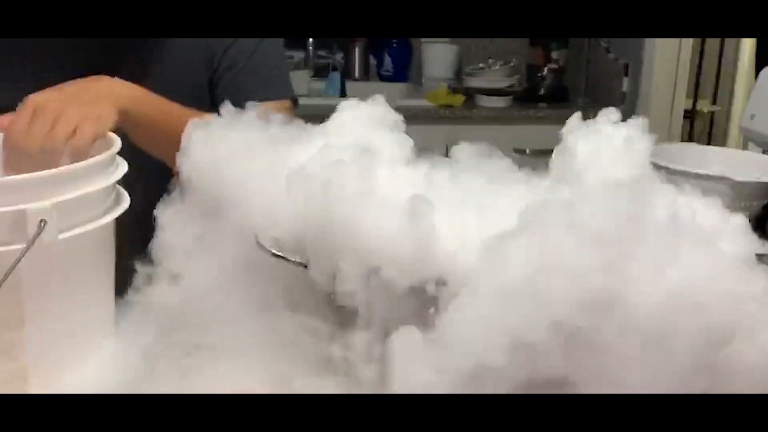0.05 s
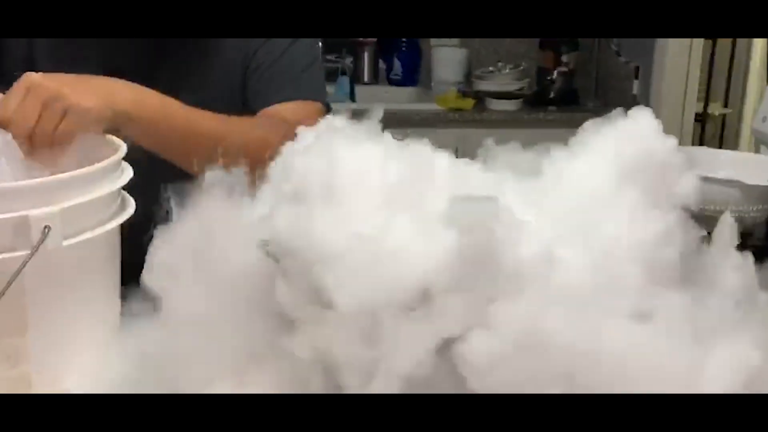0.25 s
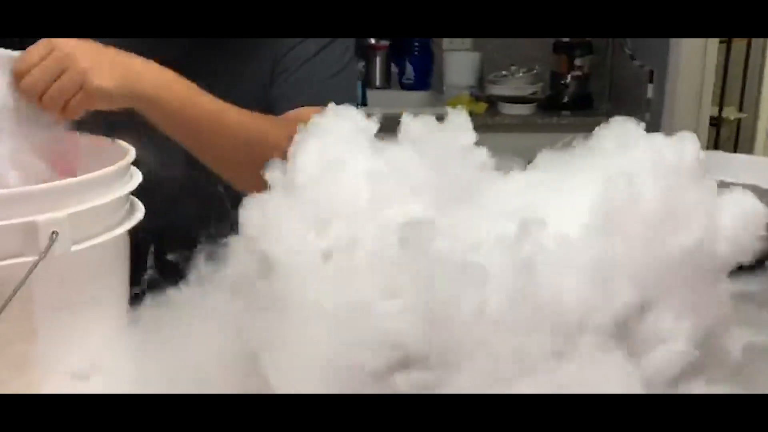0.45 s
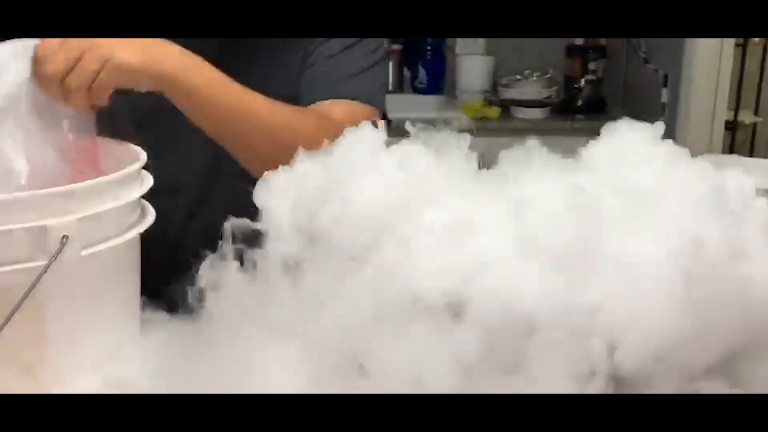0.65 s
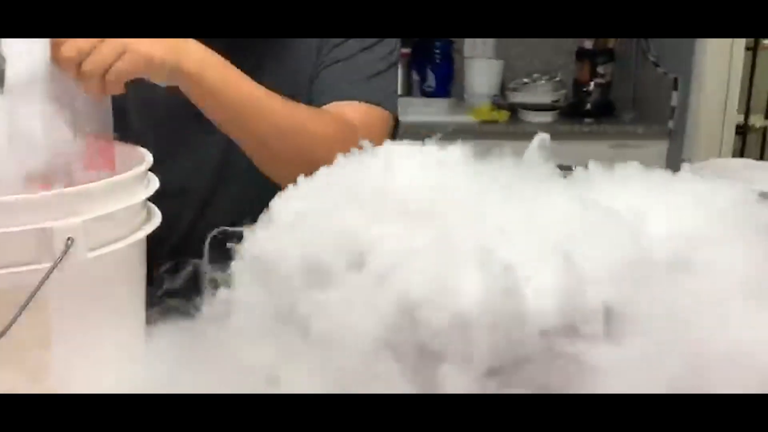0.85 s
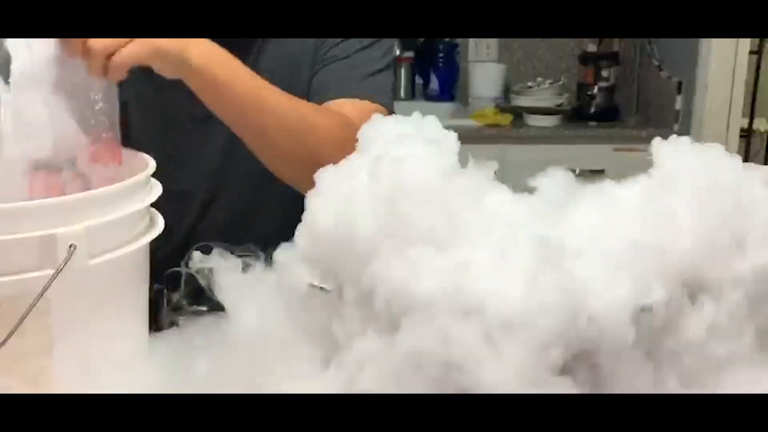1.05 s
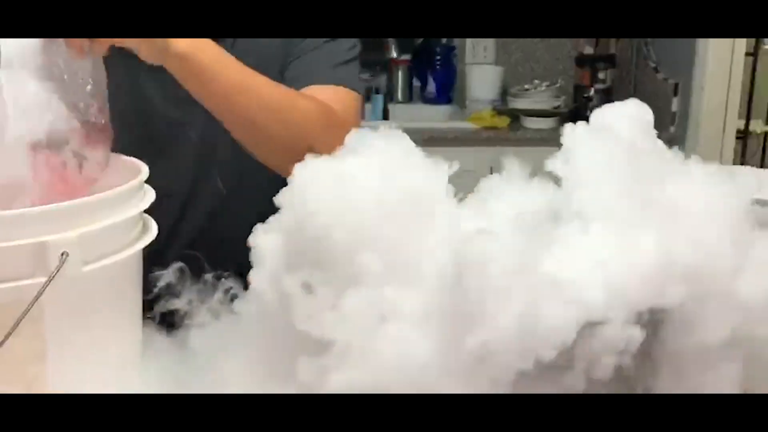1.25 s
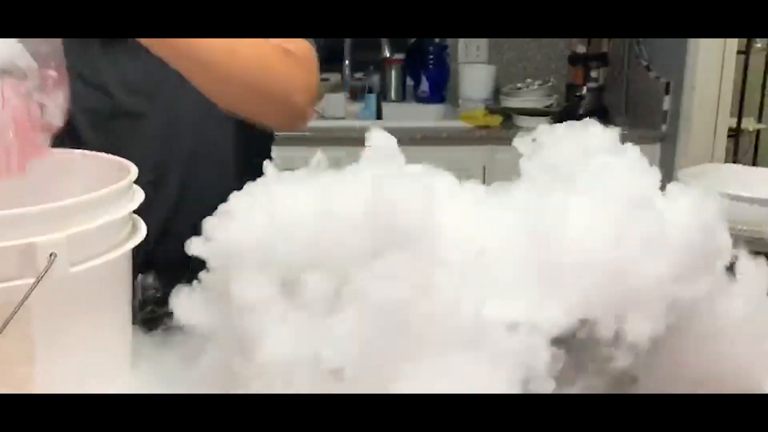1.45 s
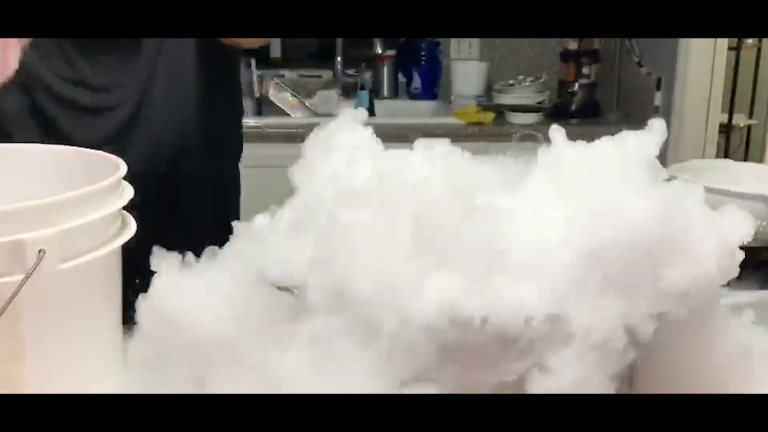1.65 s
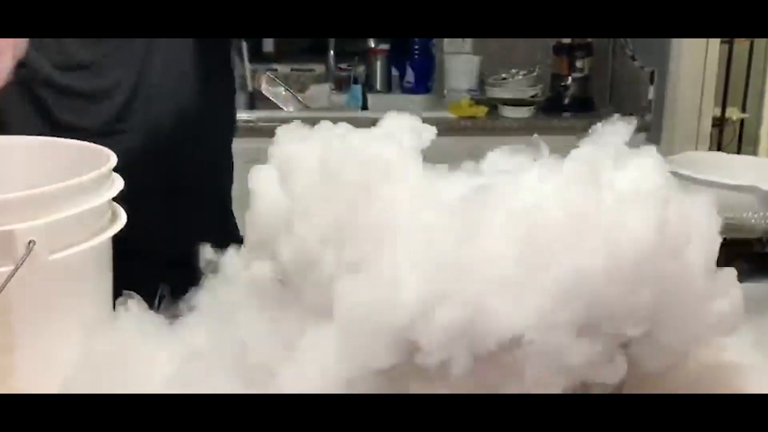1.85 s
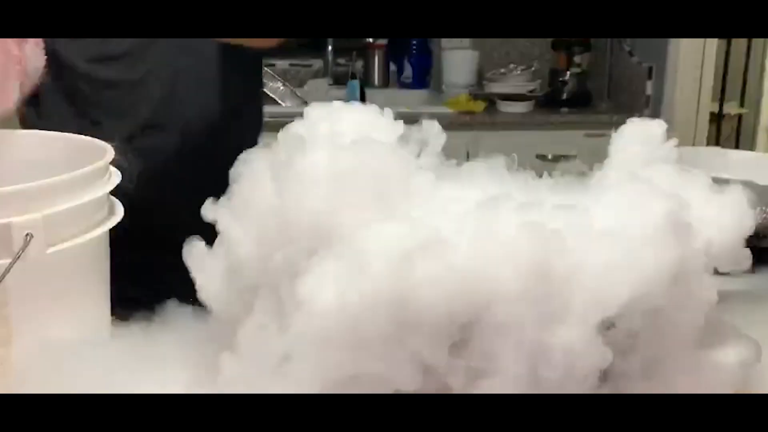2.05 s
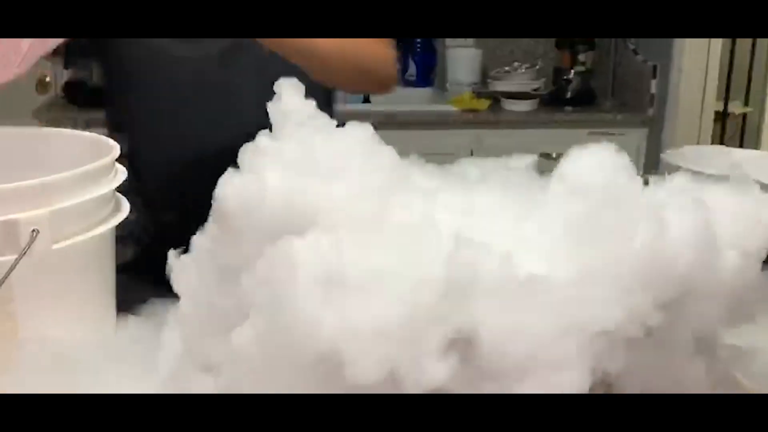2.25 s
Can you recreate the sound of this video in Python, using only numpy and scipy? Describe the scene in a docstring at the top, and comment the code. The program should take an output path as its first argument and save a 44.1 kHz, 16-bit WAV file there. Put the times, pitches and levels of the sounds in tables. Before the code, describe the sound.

Dry ice lumps slide and rattle into a hollow plastic bucket, lightly at first, with the hardest thuds and clatter around 0.2-0.55 s, then lighter knocks until 0.85 s. A plastic bag rustles and snaps crisply, sparse ticks lingering to about 2 s. Underneath, a pot bubbles and fizzes over a low rumble; after 0.9 s its gurgles and small pops stand out, with a stronger blip near 2.24 s. Close stereo, short kitchen reverb.

```python
"""Dry ice pot and rattling bucket

Lumps shaken from a plastic bag slide, rattle and thud in a bucket: short sine blows and chip clatter,
rung through the bucket's resonances. Filtered grains and ticks make the bag's rustle and snaps.
As these fade, a pot of dry ice in hot water carries on: gliding sine bubbles, bursting domes,
fizz from clustered grains and a low noise rumble. A kitchen reverb and a close stereo pair frame it.
"""
import sys
import numpy as np
from scipy import signal
from scipy.fft import rfft, irfft, next_fast_len
from scipy.io import wavfile

SR = 44100
rng = np.random.default_rng(int(sys.argv[2]) if len(sys.argv) > 2 else 0)


def transcribe(u):
    """Save the signal u as a 16-bit wav file named by the first command-line argument.

    u: samples, shape (n,) or (channels, n), limited to [-1, 1]; the rate is SR.
    q: integer samples, one column per channel.
    """
    v = np.clip(np.atleast_2d(u).T, -1, 1)
    q = np.round(v * 32767).astype(np.int16)
    wavfile.write(sys.argv[1], SR, q)


N = 101429  # length in samples

# Lumps landing in the bucket, levels ahead of its ring:
# start_s, blow_db, pitch_hz, blow_swell_s, clatter_db, clatter_decay_s
LUMP_HITS = [(.006, -28.5, 198, .005, -52, .012), (.049, -30.5, 222, 0.0041, -37.5, 0.018),
             (.122, -36, 212, .005, -47, 0.015), (.206, -24.5, 614, 0.0059, -18.5, 0.013),
             (.2093, -23.5, 1230, 0.0015, -27, .011), (.214, -21, 387, 0.005, -25, 0.018),
             (.237, -17.5, 198, 0.0028, -29.5, 0.016), (.24, -32, 82, 0.0078, -46, .015),
             (.2543, -17.5, 910, 0.0016, -24, 0.011), (.2958, -11.5, 324, 0.0013, -24, .015),
             (.2985, -17.5, 752, 0.0026, -27, 0.014), (.3035, -8.5, 226, 0.0028, -19, 0.013),
             (.316, -22, 1708, 0.0027, -18, 0.014), (.3175, -25, 1170, 0.0016, -23.5, 0.0098),
             (.3245, -15.5, 216, 0.0021, -22.5, 0.028), (.342, -26, 1782, 0.0022, -26, 0.0093),
             (.353, -16.5, 176, .0028, -25, 0.011), (.443, -7.5, 1100, .00068, -22.5, 0.0074),
             (.472, -31, 1520, 0.0024, -33, 0.012), (.518, -20.5, 1166, 0.0024, -23.5, .011),
             (.521, -39, 1960, .0012, -27.5, 0.0072), (.524, -28, 260, 0.0028, -32, 0.016),
             (.652, -23.5, 680, 0.0011, -30.5, .022), (.663, -19.5, 1530, 0.0012, -27.5, 0.019),
             (.667, -26, 2020, .0012, -29, 0.01), (.678, -39, 80, 0.011, -55, 0.013),
             (.721, -29, 770, 0.003, -28.5, .013), (.728, -21, 1510, 0.00072, -33, 0.0095),
             (.823, -27.5, 2080, 0.0019, -28.5, 0.0097), (1.1772, -26, 220, .0023, -62, .0067)]
# Resonances of the bucket: pitch_hz, width_hz, level_db
BUCKET_MODES = [(245, 22, 0.5), (345, 12, 0), (609, 36, 1.5), (715, 20, -2), (834, 61, -7),
                (1148, 51, -9.5), (1270, 40, -2), (1727, 60, -0.5), (1904, 30, -26), (2066, 96, -19.5),
                (4500, 420, 5)]
# Spectrum of the clatter, before it is focused round each lump's pitch: freq_hz, gain_db
CLATTER_COLOUR = [(30, -30), (70, 10), (200, 4), (450, -2), (1000, 5.5), (2000, 4), (3000, -3),
                  (6000, -14.5), (16000, -54)]
# Loudness of the small sliding pieces: time_s, level_db
SLIDE_LEVEL = [(0, -40.5), (.1, -39.5), (.19, -38.5), (.33, -32), (.41, -31.5), (.5, -36), (.62, -34.5),
               (.69, -33), (.8, -41.5), (.9, -44), (1.15, -45.5), (1.4, -45.5), (2.3, -60)]
# Spectrum of the sliding pieces, ahead of the bucket's ring: freq_hz, gain_db
SLIDE_SPECTRUM = [(30, -30), (65, -5.5), (200, 9.5), (450, -0.5), (1100, 0), (2000, -4), (3200, -11.5),
                  (6000, -25), (16000, -13)]
# Loudness of the bag's rustle: time_s, level_db
RUSTLE_LEVEL = [(0, -37), (.1, -36), (.2, -32.5), (.33, -28), (.4, -33.5), (.485, -27), (.55, -35.5),
                (.67, -36), (.8, -39), (.88, -44.5), (1.02, -42.5), (1.17, -42), (1.24, -46), (1.4, -45),
                (1.52, -52), (1.65, -50), (1.9, -48.5), (2.3, -56)]
# Spectrum of the rustle: freq_hz, gain_db
RUSTLE_SPECTRUM = [(100, -30), (1200, 6), (2500, 1), (4400, 4.5), (5700, 0), (8500, 6.5), (11000, 2),
                   (14000, 0.5), (16000, -6)]
# Creases of the bag snapping, levels ahead of filtering: start_s, level_db, decay_s, lower_edge_hz
CREASE_SNAPS = [(0.0332, -22.5, 0.0034, 2020), (0.0484, -12.5, 0.0006, 4050),
                (0.0604, -20.5, 0.00099, 6000), (0.252, -28, 0.0017, 5040), (0.295, -28, 0.0087, 6000),
                (0.3188, -14, .0012, 2500), (0.4265, -25, 0.0076, 5000), (0.4468, -26, 0.0024, 5000),
                (0.447, -7.5, 0.003, 9300), (0.456, -14, 0.0012, 4000), (.481, -22, 0.0036, 3500),
                (0.765, -34, 0.0067, 14200), (0.796, -30, 0.0013, 2500), (0.804, -27, .0014, 2500),
                (0.912, -32, 0.002, 12000), (0.9547, -19, 0.0014, 1500), (1.082, -33, 0.001, 7000),
                (1.1012, -30.5, 0.0071, 3500), (1.113, -22.5, 0.0024, 6000), (1.1723, -12, 0.00091, 5000),
                (1.176, -17, 0.00075, 3500), (1.541, -36, 0.00089, 2000), (1.5777, -26.5, 0.00076, 7000),
                (1.618, -31.5, 0.0011, 4040), (1.6814, -23, 0.0013, 11000), (1.9703, -30, 0.0014, 5050)]
# Spectrum shared by the snaps: freq_hz, gain_db
SNAP_SPECTRUM = [(100, -9), (2000, 5), (6000, 4), (11000, 4.5), (16000, -5)]
# Large bubbles ringing in the pot: start_s, level_db, pitch_hz, decay_s, glide_share_per_s
LARGE_BUBBLES = [(.864, -32, 214, 0.0098, 2.5), (.932, -28.5, 370, 0.01, -3), (.978, -26, 244, 0.0098, 1.5),
                 (1.0, -29.5, 790, 0.0056, 10), (1.099, -32.5, 938, 0.011, 8), (1.233, -27, 332, .021, 4),
                 (1.28, -30, 990, 0.0091, 0.5), (1.361, -27, 1032, 0.0066, -1),
                 (1.378, -34, 1252, 0.008, 3), (1.424, -28.5, 980, .0065, 7.5),
                 (1.459, -34, 1286, 0.011, 1), (1.532, -36, 660, 0.0065, 15),
                 (1.575, -29.5, 893, 0.013, 0.5), (1.634, -29.5, 651, 0.0085, 5),
                 (1.647, -31.5, 1130, 0.0068, 4), (1.657, -30, 840, 0.029, 2.5),
                 (1.692, -29, 804, .008, -1), (1.816, -26, 766, 0.0099, -6), (1.834, -27, 350, .012, -3),
                 (1.843, -27.5, 1027, 0.0069, 3.5), (1.904, -29, 1025, 0.0063, 6),
                 (1.936, -35, 915, .007, -5), (1.952, -36, 62, 0.031, -6), (2.015, -25.5, 860, 0.0058, 2.5),
                 (2.121, -32.5, 327, 0.021, 3), (2.219, -24, 900, 0.012, 8.5), (2.239, -17, 930, .005, -1),
                 (2.255, -32, 343, 0.016, 1.5)]
# Domes of water bursting at the surface: start_s, level_db, pitch_hz, decay_s
DOME_POPS = [(1.356, -44, 1930, .008), (1.436, -41.5, 2350, 0.012), (1.599, -44, 1700, .008),
             (1.69, -36.5, 1754, 0.012), (1.694, -39.5, 2300, 0.0064), (1.836, -39, 1730, 0.0044),
             (1.891, -40, 1290, 0.018), (1.905, -35.5, 2220, 0.0064), (1.936, -33.5, 1770, 0.0041),
             (1.992, -39, 2224, 0.011), (2.031, -35.5, 2390, 0.0069), (2.135, -33.5, 1720, 0.0074),
             (2.24, -32, 2300, 0.0033), (2.278, -36.5, 2100, 0.0075)]
# Strength of the boil: time_s, level_db
BOIL_LEVEL = [(0, -41), (.6, -37), (1.1, -40.5), (1.6, -39.5), (2.3, -39)]
# Spectrum of the boil: freq_hz, gain_db
BOIL_SPECTRUM = [(60, -13), (130, -4), (230, 2), (280, 1), (350, 4), (430, -1.5), (600, -4.5), (950, -2),
                 (1300, -12.5), (1700, -16), (2500, -24), (4000, -27.5), (16000, -31)]
# Spectrum of the fizz from the smallest bubbles: freq_hz, gain_db
FIZZ_SPECTRUM = [(100, -24.5), (1000, 12), (2200, -6), (3300, -2.5), (4400, 0.5), (5600, -9.5), (8000, -15),
                 (11000, -32), (16000, -14)]
# Loudness of the fizz: time_s, level_db
FIZZ_LOUDNESS = [(0, -46.5), (1.4, -48), (1.95, -48), (2.3, -49.5)]
# Spectrum of the pot's rumble: freq_hz, gain_db
RUMBLE_SPECTRUM = [(10, -50), (25, -33), (38, -22), (58, 4.5), (75, -7.5), (100, -2), (150, -1), (300, -36),
                   (1000, -44), (16000, -69)]
# Kitchen reverberation time: freq_hz, t60_s
ROOM_DECAY = [(100, 0.52), (500, 0.23), (2000, 0.25), (8000, 0.079), (16000, 0.21)]
# Spectral balance of the reverberation: freq_hz, gain_db
ROOM_COLOUR = [(50, 0.5), (230, -13.5), (500, 8), (1000, -1), (16000, 2)]
# Gain of the side signal, for stereo width: freq_hz, gain_db
STEREO_WIDTH = [(50, -8), (300, -12), (550, -2), (1000, 3), (1600, 5), (5500, 4.5), (7300, 1.5),
                (8300, -18.5), (8900, -47), (9600, 3), (10500, -7), (11500, -10), (12300, -36),
                (13200, -14), (13900, -15), (14500, -13), (15500, -7)]
# Phase between the microphone's two ports: freq_hz, phase_rad
PORT_PHASE = [(50, -.2), (400, -.2), (800, .3), (2000, -.2), (6500, 0), (8000, -3.1), (8900, -3.2),
              (10300, -6.25), (11600, -6.3), (12900, -9.4), (14000, -9.45), (15100, -12.5)]
# Extra phase for the blows and clatter: freq_hz, phase_rad
KNOCK_PHASE = [(50, 0.55), (400, 0.95), (800, 0.33), (1300, 1.55), (1900, 8.3), (2600, 3.3), (3800, 6),
               (5000, 5.9), (16000, 1)]
# Extra phase for the snaps: freq_hz, phase_rad
CREASE_PHASE = [(50, 0.24), (4000, 1.2), (8000, 0.57), (16000, 0.02)]

CHIPS_PER_S, CHIP_SPREAD_DB = 5000, 2.5  # chips of ice in a clatter
CLATTER_RISE_S, CLATTER_OCTAVES = 0.0013, 1.44  # the focus is 3 dB down this far from the pitch
BLOW_RING_DB = -0.5  # trim of the bucket's ring for the blows
SLIDE_PER_S, SLIDE_SPREAD_DB = 1800, 5
RUSTLE_PER_S, RUSTLE_SPREAD_DB = 7500, 3
RUSTLE_CLUMP_DB, RUSTLE_CLUMPS_HZ = 2.5, 47.3  # depth and speed of the flicker
SNAP_RISE_S = 0.00015
BUBBLE_RISE_SHARE = 0.2  # rise time as a share of the decay
GLIDE_PER_S, GLIDE_SPREAD_PER_S = 3.84, 3.5  # pitch glide as a share of the starting pitch
BUBBLES_PER_S, BUBBLE_SPREAD_DB = 800, 2  # nominal rate, weighted by pitch in the swarm
SWARM_DECAY = 4.74  # divided by (pitch in Hz + 200) to give seconds
POP_BLIP_DB, POP_PUFF_DB = 0, -4.5  # trims of the two parts of a burst
POP_WIDTH_HZ, POP_RISE_S = 380, 0.001  # the puff's bandwidth and rise
FIZZ_PER_S, FIZZ_SPREAD_DB = 3000, 3.5  # grains feeding each size band
FIZZ_CLUMP_DB, FIZZ_CLUMPS_HZ = 4.5, 25  # depth and speed of the flicker
RUMBLE_DB = -49.5
KNOCK_WET_DB, BAG_WET_DB, POT_WET_DB, SNAP_WET_DB = -5, 0, -5, -14  # reverb sends
LOW_CUT_HZ, EDGE_HZ = 43, 16100  # lower and upper limits of the microphone


def amp(db):
    """Decibels to gain."""
    return 10 ** (np.asarray(db) / 20)


def evened(x):
    """Scales to an rms of 1."""
    return x / np.sqrt(np.mean(x ** 2) + 1e-20)


def read(points, hz):
    """Reads a table on a log-frequency axis."""
    f, value = np.transpose(points)
    return np.interp(np.log(hz + 1), np.log(f + 1), value)


def level(points):
    """Gain over time from time_s, level_db points."""
    return amp(np.interp(np.arange(N) / SR, *np.transpose(points)))


def add(mix, start_s, sound):
    """Mixes a sound in at its start time."""
    part = mix[max(round(start_s * SR), 0):][:len(sound)]
    part += sound[:len(part)]


def swell_and_fade(t, rise_s, decay_s):
    """Envelope with an exponential rise and decay."""
    return (1 - np.exp(-t / rise_s)) * np.exp(-t / decay_s)


def colour(x, points, size=4096):
    """Minimum-phase filter with the given spectrum, so nothing sounds ahead of its cause."""
    log_gain = np.log(amp(read(points, abs(np.fft.fftfreq(size, 1 / SR)))))
    spectrum = np.exp(np.conj(signal.hilbert(log_gain)))
    taps = np.fft.ifft(spectrum).real[:size // 2]
    return signal.fftconvolve(x, taps)[:len(x)]


def clicks(per_s, spread_db):
    """Random impulses, many small and a few large."""
    size = amp(spread_db * np.minimum(rng.exponential(1, N), 4.5))
    sign = rng.choice([-1, 1], N)
    struck = rng.random(N) < per_s / SR
    return size * sign * struck


def clumps(depth_db, hz):
    """A gain that wanders at random, so that grains come in clusters."""
    wander = signal.lfilter(*signal.butter(2, hz, fs=SR), rng.standard_normal(N))
    return amp(depth_db * evened(wander))


def bucket(x, ring_db=0):
    """The plastic wall and the air in the bucket ring along with what strikes them."""
    ring = np.zeros(len(x))
    for hz, width_hz, db in BUCKET_MODES:
        ring += amp(db + ring_db) * signal.lfilter(*signal.iirpeak(hz, hz / width_hz, SR), x)
    return x + ring


def knocks():
    """Each lump gives a short sine blow and a burst of chips clattering around the same pitch."""
    blows, clatters, t = np.zeros(N), np.zeros(N), np.arange(SR // 4) / SR
    bands = np.geomspace(20, 20000, 40)
    for start_s, blow_db, hz, swell_s, clatter_db, decay_s in LUMP_HITS:
        swell = t / swell_s * np.exp(1 - t / swell_s)  # peaks at 1 after swell_s
        add(blows, start_s, amp(blow_db) * np.sin(2 * np.pi * hz * t) * swell)
        octaves = np.log2(bands / hz)
        focus_db = -10 * np.log10(1 + (octaves / CLATTER_OCTAVES) ** 4)
        spectrum = np.c_[bands, read(CLATTER_COLOUR, bands) + focus_db]
        chips = clicks(CHIPS_PER_S, CHIP_SPREAD_DB)[:len(t)]
        clatter = evened(colour(chips, spectrum)) * swell_and_fade(t, CLATTER_RISE_S, decay_s)
        add(clatters, start_s, amp(clatter_db) * clatter)
    return bucket(blows, BLOW_RING_DB) + bucket(clatters)


def slide():
    """Small pieces rattle into the bucket as a stream of grains that excite its ring."""
    pieces = colour(clicks(SLIDE_PER_S, SLIDE_SPREAD_DB), SLIDE_SPECTRUM)
    return level(SLIDE_LEVEL) * evened(bucket(pieces))


def rustle():
    """Dense tiny crackles of the bag, arriving in clumps."""
    crackles = clumps(RUSTLE_CLUMP_DB, RUSTLE_CLUMPS_HZ) * clicks(RUSTLE_PER_S, RUSTLE_SPREAD_DB)
    return level(RUSTLE_LEVEL) * evened(colour(crackles, RUSTLE_SPECTRUM))


def snaps():
    """Single creases flip over with a sharp noise tick; a higher lower edge sounds thinner."""
    out, t = np.zeros(N), np.arange(SR // 20) / SR
    for start_s, db, decay_s, edge_hz in CREASE_SNAPS:
        tick = rng.choice([-1, 1], len(t)) * swell_and_fade(t, SNAP_RISE_S, decay_s)
        thin = signal.lfilter(*signal.butter(1, edge_hz, "highpass", fs=SR), tick)
        add(out, start_s, amp(db) * thin)
    return colour(out, SNAP_SPECTRUM)


def bubble(hz, decay_s, glide):
    """A pocket of gas swells into a brief ring with a gliding pitch."""
    t = np.arange(SR // 5) / SR
    tone = np.sin(2 * np.pi * hz * (t + glide * t ** 2 / 2))
    return tone * swell_and_fade(t, BUBBLE_RISE_SHARE * decay_s, decay_s)


def gulps():
    """Large bubbles ring one by one, each at its own pitch."""
    out = np.zeros(N)
    for start_s, db, hz, decay_s, glide in LARGE_BUBBLES:
        add(out, start_s, amp(db) * bubble(hz, decay_s, glide))
    return out


def pops():
    """A bursting dome gives a tonal blip and a short puff of noise around the same pitch."""
    out, t = np.zeros(N), np.arange(SR // 10) / SR
    for start_s, db, hz, decay_s in DOME_POPS:
        noise = rng.standard_normal(len(t))
        puff = evened(signal.lfilter(*signal.iirpeak(hz, hz / POP_WIDTH_HZ, SR), noise))
        puff *= swell_and_fade(t, POP_RISE_S, decay_s)
        add(out, start_s, amp(db + POP_BLIP_DB) * bubble(hz, decay_s, GLIDE_PER_S))
        add(out, start_s, amp(db + POP_PUFF_DB) * puff)
    return out


def boil(count=48):
    """A swarm of bubbles of many sizes; higher ones ring shorter and come more often."""
    swarm = np.zeros(N)
    for hz in np.geomspace(130, 3000, count):
        rate = BUBBLES_PER_S / count * np.sqrt(hz / 700)
        # most pitches climb, as a bubble's does when it nears the surface
        glide = rng.normal(GLIDE_PER_S, GLIDE_SPREAD_PER_S)
        ring = evened(bubble(hz, SWARM_DECAY / (hz + 200), glide))
        swarm += hz ** 0.53 * signal.oaconvolve(clicks(rate, BUBBLE_SPREAD_DB), ring)[:N]
    return level(BOIL_LEVEL) * evened(colour(swarm, BOIL_SPECTRUM))


def fizz(count=8):
    """The smallest bubbles burst in clusters, each frequency band in its own rhythm."""
    edges, out = np.linspace(100, 12000, count + 1), np.zeros(N)
    for band in zip(edges, edges[1:]):
        bursts = clumps(FIZZ_CLUMP_DB, FIZZ_CLUMPS_HZ) * clicks(FIZZ_PER_S, FIZZ_SPREAD_DB)
        out += signal.lfilter(*signal.butter(2, band, "bandpass", fs=SR), bursts)
    return level(FIZZ_LOUDNESS) * evened(colour(out, FIZZ_SPECTRUM))


def rumble():
    """Steady low noise of the pot."""
    return amp(RUMBLE_DB) * evened(colour(rng.standard_normal(N), RUMBLE_SPECTRUM))


def room(x, wet_db, size=16384):
    """Direct sound plus a separate diffuse noise tail at each port, decaying by frequency."""
    hz, t, z = signal.stft(rng.standard_normal((2, size)), SR, nperseg=256)
    decay = np.exp(-np.log(1000) * t / read(ROOM_DECAY, hz)[:, None])
    tail = signal.istft(z * amp(read(ROOM_COLOUR, hz))[:, None] * decay, SR)[1]
    tail *= np.minimum(np.arange(tail.shape[1]) / SR / 0.0029, 1)  # fades in over 2.9 ms
    tail /= np.linalg.norm(tail[0])
    return x + amp(wet_db) * signal.fftconvolve(x[None], tail, axes=1)[:, :N]


def ports(x, phases, widths=None):
    """Sets the stereo width and turns the left port's phase against the right."""
    size = next_fast_len(N + SR // 10)
    hz, (left, right) = np.fft.rfftfreq(size, 1 / SR), rfft(x, size)
    mid, side = (left + right) / 2, (left - right) / 2
    if widths:
        side = side * amp(read(widths, hz))
    turn = np.exp(1j * read(phases, hz))
    return irfft(np.array([(mid + side) * turn, mid - side]), size)[:, :N]


def scene():
    """Bucket and rustle a touch to the left, pot a little to the right, snaps nearly dry."""
    lumps = ports(room(knocks(), KNOCK_WET_DB), KNOCK_PHASE)
    bucket_side = lumps + room(slide() + rustle(), BAG_WET_DB)
    pot_side = room(gulps() + pops() + boil() + fizz() + rumble(), POT_WET_DB)
    ticks = ports(room(snaps(), SNAP_WET_DB), CREASE_PHASE)
    # left and right gains in dB
    placed = bucket_side * amp([[.2], [-.2]]) + pot_side * amp([[-.7], [.7]])
    return ports(placed, PORT_PHASE, STEREO_WIDTH) + ports(ticks, PORT_PHASE)


def record(dry):
    """The microphone's low cut, then the band limit."""
    heard = signal.lfilter(*signal.butter(3, LOW_CUT_HZ, "highpass", fs=SR), dry)
    band_limit = signal.firwin(511, EDGE_HZ, window=("kaiser", 9), fs=SR)
    return signal.oaconvolve(heard, band_limit[None], "same")


dry = scene()
out = record(dry)
transcribe(out)
```